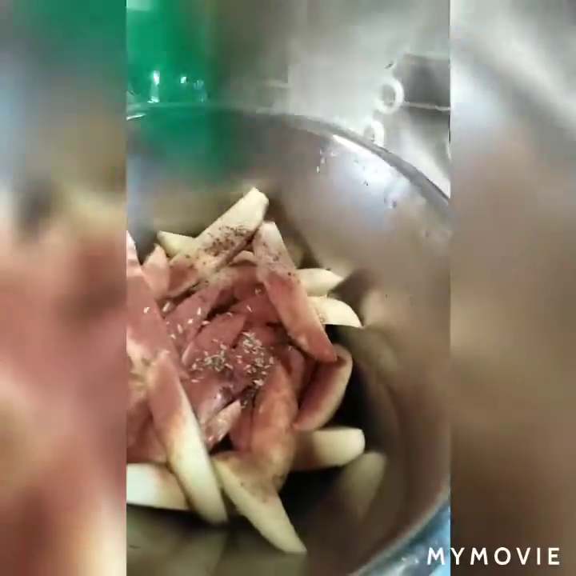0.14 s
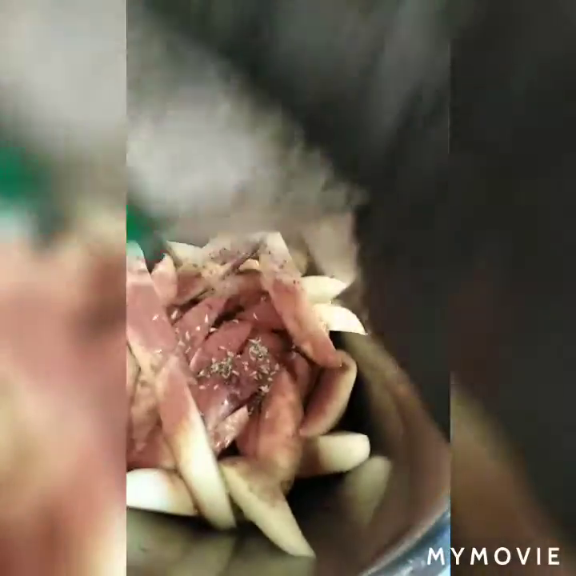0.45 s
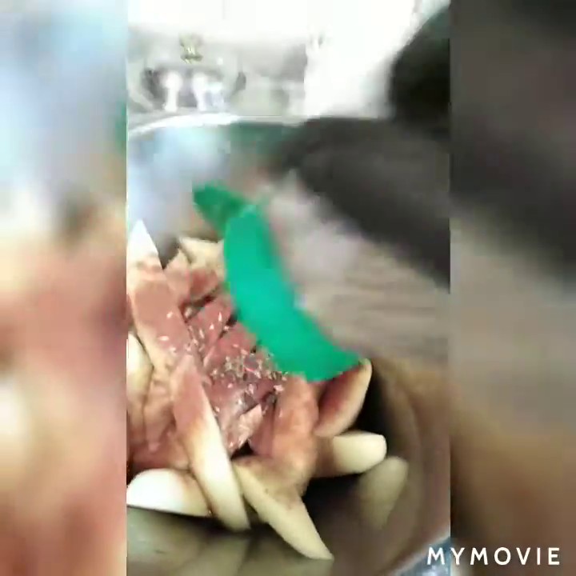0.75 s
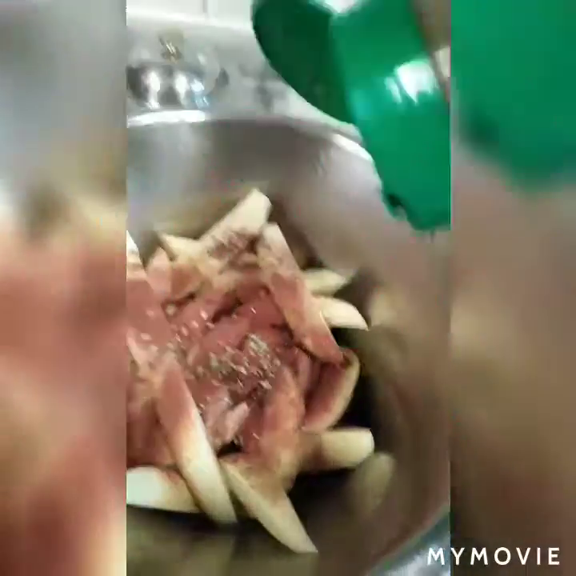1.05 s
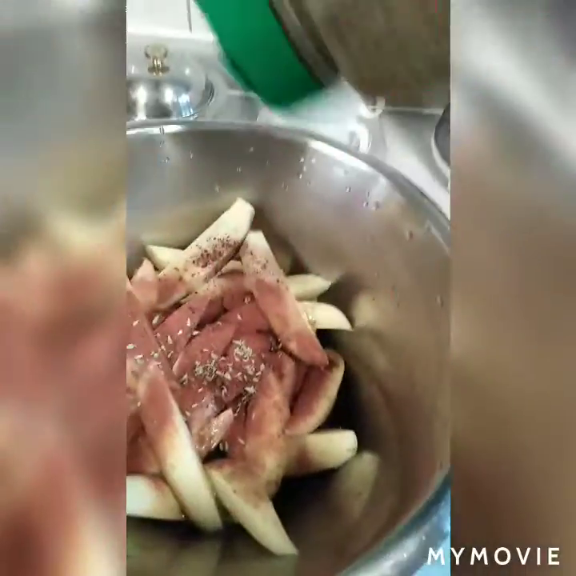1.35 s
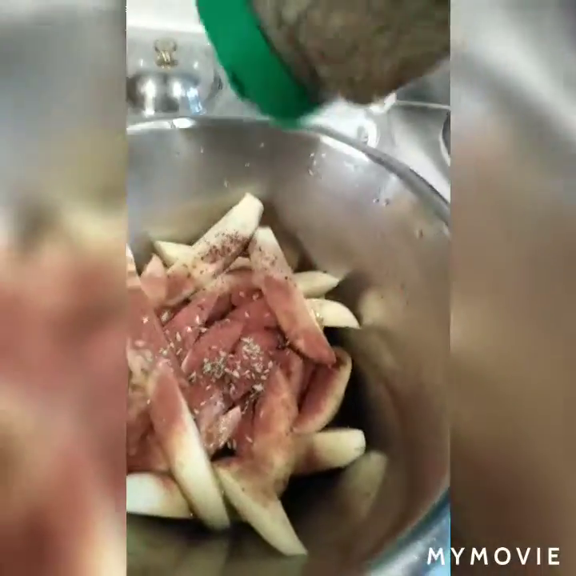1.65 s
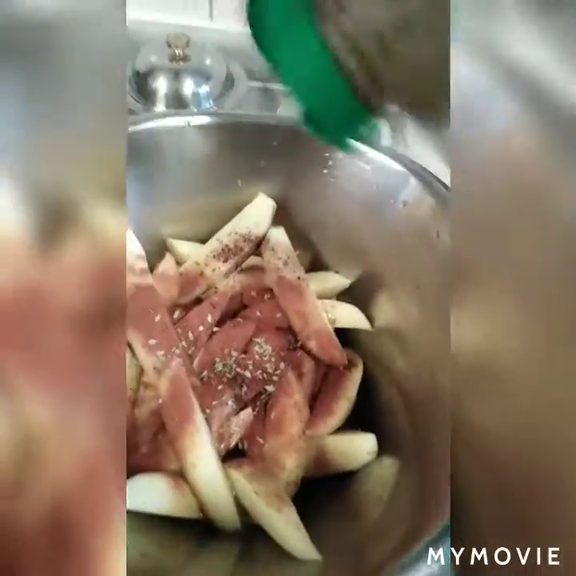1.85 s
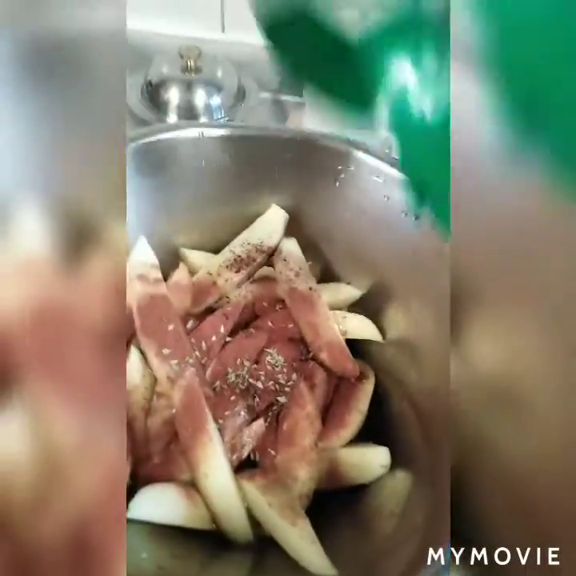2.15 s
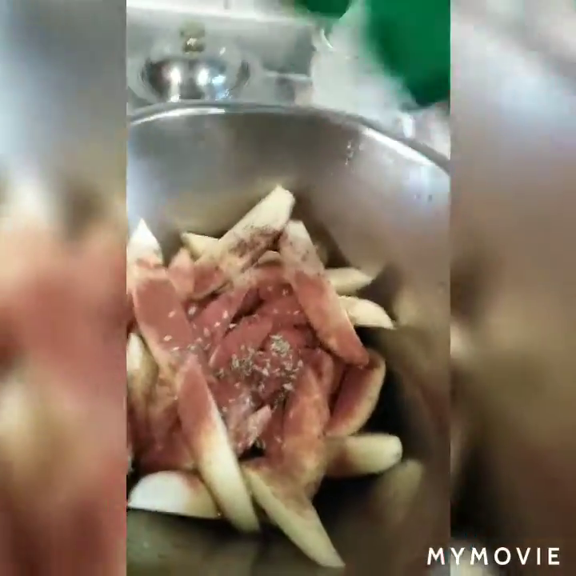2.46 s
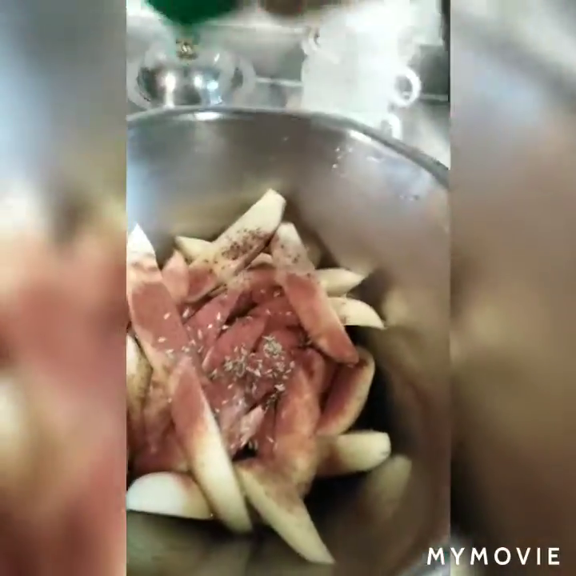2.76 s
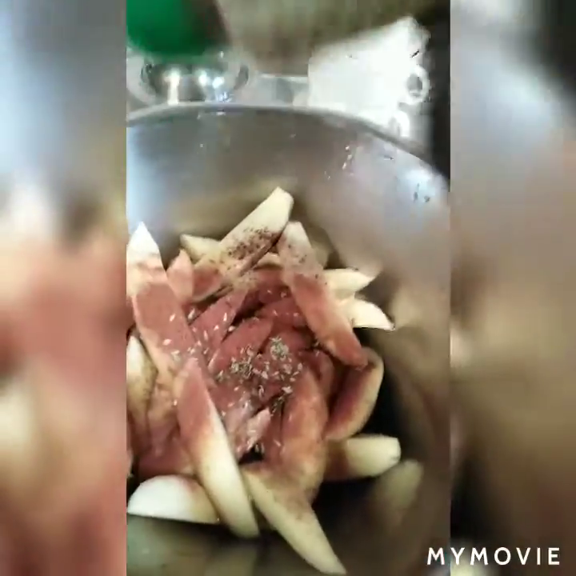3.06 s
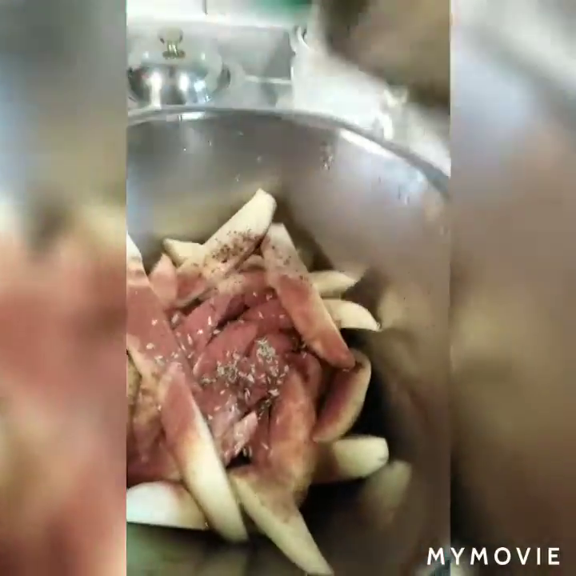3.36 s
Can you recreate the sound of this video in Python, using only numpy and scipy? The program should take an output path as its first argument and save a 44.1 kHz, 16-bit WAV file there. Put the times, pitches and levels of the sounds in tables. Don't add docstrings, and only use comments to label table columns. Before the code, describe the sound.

Dried herbs shaken in a plastic jar, heard close by phone in a small, slightly echoing kitchen. A hollow knock comes at 0.1 s, then bright, grainy bursts swish back and forth about five times a second, with a sharp snap near 0.6 s and lighter ticks until 2.9. At 3.0 s loud knocks make the steel bowl ring and buzz; duller knocks follow at 3.25. A fridge hums faintly throughout.

```python
import sys
import numpy as np
from scipy import signal
from scipy.fft import rfft, irfft
from scipy.io import wavfile
from scipy.ndimage import uniform_filter1d

SR = 44100
rng = np.random.default_rng(int(sys.argv[2]) if len(sys.argv) > 2 else 0)


def boost_factor(decibels):
    exponent = np.asarray(decibels, float) / 20
    return 10 ** exponent


def file_out(sig):
    cols = np.atleast_2d(sig).T
    lim = np.clip(cols, -1, 1)
    pcm = np.round(lim * 32767).astype(np.int16)
    wavfile.write(sys.argv[1], SR, pcm)


N = 154350
LEAD_S = .08
RIM_S = 3.0287


def evened(x):
    return x / np.sqrt(np.mean(x ** 2) + 1e-20)


def read(points, hz):
    f, value = np.transpose(points)
    return np.interp(np.log(hz + 1), np.log(f + 1), value)


def add(mix, s, sound):
    part = mix[round(s * SR):][:len(sound)]
    part += sound[:len(part)]


def resonate(x, hz, width_hz):
    turn = np.exp(2j * np.pi * hz * np.arange(len(x)) / SR)
    r = np.exp(-np.pi * width_hz / SR)
    return 2 * (turn * signal.lfilter([1 - r], [1, -r], x / turn)).real


def colour(x, db_of_hz):
    hz = np.fft.rfftfreq(len(x), 1 / SR)
    return irfft(rfft(x) * boost_factor(db_of_hz(hz)), len(x))


def coloured_noise(count, db_of_hz):
    return evened(colour(rng.standard_normal(count), db_of_hz))


def wander(count, size):
    return evened(uniform_filter1d(uniform_filter1d(rng.standard_normal(count), size), size))


def highpass(x, order, cut_hz):
    return signal.sosfilt(signal.butter(order, cut_hz, "high", fs=SR, output="sos"), x)


def ring(modes, t):
    out = np.zeros(len(t))
    for k, (hz, db, t60_s) in enumerate(modes):
        decay = boost_factor(db - 60 * t / max(t60_s, .005))
        out += (-1) ** k * decay * np.sin(2 * np.pi * hz * t)
    return out


def swing(length_s, level_db, tilt_db, swell_db_ms, fall_db_s, sag_db):
    # freq_hz, density_db_per_hz
    flakes = [(250, -13), (550, -12), (1000, -11), (1500, -11.5), (2000, -8.5), (3500, -9), (11200, -6.5),
              (14500, -11.5)]
    flakes_per_s, spread_db, patch_db, clump_db = 24000, .7, 2.5, 1
    t = np.arange(12288) / SR - LEAD_S
    hit = rng.random(len(t)) < flakes_per_s / SR
    size = np.minimum(rng.exponential(1, len(t)), 5)
    clicks = hit * boost_factor(spread_db * size) * rng.standard_normal(len(t))

    z = signal.stft(clicks, nperseg=256)[2]
    patch = uniform_filter1d(rng.standard_normal(z.shape), size=15, axis=0)
    patch = evened(uniform_filter1d(patch, size=7, axis=1))
    clicks = signal.istft(z * boost_factor(patch_db * patch), nperseg=256)[1][:len(t)]
    shower = evened(colour(clicks, lambda hz: read(flakes, hz) + tilt_db * np.log2((hz + 200) / 6000)))

    swell = swell_db_ms * 1000 * np.minimum(t, 0)
    sag = sag_db * np.clip(t / length_s, 0, 1)
    fall = fall_db_s * np.maximum(t - length_s, 0)
    shape_db = uniform_filter1d(swell + sag - fall, size=250)
    return shower * boost_factor(level_db + shape_db + clump_db * wander(count=len(t), size=150))


def shakes():
    # arrival_s, length_s, level_db, tilt_db_per_octave, swell_db_per_ms
    throws = [(.254, 0.031, -31.5, -0.2, 1.1), (0.419, 0.088, -50, -1.5, 7),
              (0.603, 0.04, -35.5, 0.55, 1.5), (0.791, 0.038, -32.5, -1, 1.3), (.987, 0.039, -33, 1, 0.8),
              (1.185, .015, -32, 1, 2.4), (1.359, .045, -41, -0.6, 0.5), (1.533, 0.029, -44, -0.6, 0.5),
              (1.698, 0.032, -42.5, -0.5, .5), (1.907, 0.056, -42, -0.2, 0.7),
              (2.134, 0.042, -40.5, -0.5, 0.4), (2.353, 0.043, -39, 0, 0.3), (2.573, 0.046, -41, -0.6, .5),
              (2.954, .05, -38.5, -0.2, 2.4), (3.305, 0.031, -36.5, 0.3, 0.6), (0.061, .17, -60, -2, .3),
              (2.77, 0.079, -62.5, 0.1, .3), (1.222, 0.024, -38.5, 1.5, 1.2), (3.122, 0.2, -57.5, -3, 4),
              (3.44, .08, -50, -1, .3)]
    # arrival_s, length_s, level_db, tilt_db_per_octave, swell_db_per_ms
    returns = [(.008, 0.0094, -40, 1.5, 1.5), (.318, 0.015, -27, -0.14, 1), (0.667, 0.0077, -34, -0.8, 1),
               (0.861, 0.018, -34, -0.7, .5), (0.894, 0.028, -39, -0.4, .3), (1.071, 0.031, -36, -0.3, .3),
               (1.271, 0.016, -37.5, 0.1, 0.2), (1.435, 0.024, -37, 0.1, 0.6),
               (1.608, 0.0089, -39, 0.5, .35), (1.776, 0.016, -38.5, -0.4, 0.64),
               (1.992, .03, -37, -0.36, .6), (2.228, 0.023, -34, 0.56, 0.5), (2.444, 0.036, -35, -0.2, 0.3),
               (2.669, 0.035, -36.5, -0.17, 0.55), (3.029, 0.013, -29, -3.7, 1.8),
               (3.368, 0.013, -32.5, 0.1, 0.46)]
    out = np.zeros(N + SR)
    for start_s, *row in throws:
        add(out, start_s, swing(*row, fall_db_s=486, sag_db=-2.5))
    for start_s, *row in returns:
        add(out, start_s, swing(*row, fall_db_s=474, sag_db=-0.5))
    return out[round(LEAD_S * SR):][:N]


def ticks():
    # start_s, level_db, length_s
    clumps = [
        (0.565, -45.5, 0.037),
        (0.959, -35.5, 0.011),
        (1.158, -48, .02),
        (1.305, -37, 0.0068),
        (2.091, -36, 0.012),
        (2.307, -31.5, 0.0051),
        (2.524, -43.5, 0.012),
        (2.876, -59, 0.027),
        (.498, -50.5, 0.027),
    ]
    # freq_hz, width_hz, level_db
    lid_modes = [(7300, 2500, 14), (11800, 5600, -0.5)]
    out, t = np.zeros(N), np.arange(3000) / SR
    for start_s, db, length_s in clumps:
        puff = rng.standard_normal(len(t))
        lid = sum(boost_factor(g) * resonate(resonate(puff, hz, w), hz, w) for hz, w, g in lid_modes)
        attack = np.minimum(t / 0.00091, 1)
        add(out, start_s, evened(lid) * attack * boost_factor(db - 9 * t / length_s))
    return out


def snaps():
    # start_s, level_db
    grains = [
        (.5965, -21),
        (2.0925, -34),
        (2.3065, -29),
        (1.3115, -33),
    ]
    out, t = np.zeros(N), np.arange(400) / SR
    for start_s, db in grains:
        bright = evened(np.diff(rng.standard_normal(401)))
        add(out, start_s, bright * boost_factor(db - 60 * t / .004))
    return out


def herbs():
    return highpass(shakes() + ticks() + snaps(), 3, cut_hz=240)


def counter_boom(t, level_db, body_hz):
    # freq_hz, density_db_per_hz
    wood = [(70, -6), (130, 2), (280, 0.5), (500, 0.1), (1100, -10), (1500, -29), (3000, -45)]
    rim_loss_db = -14 * np.log2(body_hz / 430)
    boom = coloured_noise(len(t), lambda hz: read(wood, hz))
    return boom * (1 - np.exp(-t / 0.0075)) * boost_factor(level_db - 21.5 + rim_loss_db - 60 * t / 0.26)


def jar_knocks():
    # start_s, level_db, body_hz, blow_ms, crack_db
    blows = [
        (0.0783, -27, 236, 1.7, -62),
        (0.1054, -9, 440, .5, -32),
        (3.0058, -8, 420, 1.6, -64),
        (3.0286, -2, 660, .3, -28),
        (3.0367, -6, 570, 1, -53),
        (3.2292, -9, 350, .25, -39),
        (3.263, -14, 420, .35, -37),
        (3.434, -50, 430, .3, -44),
    ]
    # body_t60_s, low_walls_db, high_walls_db, counter_db
    grips = [
        (.025, -8, -15, -14),
        (.045, 1, -1, 2),
        (.034, -14, -25, -8),
        (.018, -12, -1, -3),
        (.016, -12, -12, -3),
        (.025, -3, 2, -4),
        (.03, -5, 2, -3),
        (.04, 0, 0, 0),
    ]
    # freq_hz, level_db, t60_s
    low_walls = [(125, -17, .07), (290, -9, .04), (510, -10, .05), (735, -15, .04)]
    # freq_hz, level_db, t60_s
    high_walls = [(960, -8, .04), (1130, -10, .022), (1400, -8, .018), (1800, -13, .014), (2180, -14, .018),
                  (2800, -25, .012)]
    out, t = np.zeros(N), np.arange(SR // 2) / SR
    for (start_s, db, hz, blow_ms, crack_db), (t60_s, low_db, high_db, counter_db) in zip(blows, grips):
        blow = np.sin(np.pi * np.minimum(t[:400] * 1000 / blow_ms, 1)) ** 2
        body = ring([(hz, 0, t60_s)], t)
        body += boost_factor(low_db) * ring(low_walls, t) + boost_factor(high_db) * ring(high_walls, t)
        body *= 1 - np.exp(-t / .0008)
        add(out, start_s, boost_factor(db) * np.convolve(body, blow / blow.sum()))
        add(out, start_s, counter_boom(t, db + counter_db, hz))
        grit = coloured_noise(len(t), lambda f: -4 * np.log2(f / 1000 + 1))
        add(out, start_s, grit * boost_factor(crack_db - 60 * t / .045))
    return out


def rim():
    # freq_hz, level_db, t60_s
    bowl = [(730, -8, .2), (361, -6, .2), (1053, 0, .17), (1745, -11, .07), (1150, -1, .15), (1260, -9, .4),
            (1324, -13, .15), (1596, -7.5, .4), (1680, -7, .22), (2492, -17, .15), (2729, -17, .2),
            (3420, -3, .05), (4377, -11, .05), (3920, -13, .06)]
    out, t = np.zeros(N), np.arange(SR // 2) / SR
    for mode, late in zip(bowl, rng.random(len(bowl))):
        add(out, RIM_S + late / mode[0], boost_factor(-23) * ring([mode], t))
    return out


def knocks():
    return highpass(jar_knocks() + rim(), 4, cut_hz=100)


def buzz():
    # freq_hz, density_db_per_hz
    shimmer = [(300, -10), (750, 1), (1050, -2), (1400, -7), (1750, -6), (2100, -15), (3400, -15),
               (6000, -28)]
    out, t = np.zeros(N), np.arange(SR // 2) / SR
    noise = coloured_noise(len(t), lambda hz: read(shimmer, hz))
    level_db = -32.5 - 60 * t / .33 + 2.5 * wander(count=len(t), size=120)
    add(out, RIM_S, noise * (1 - np.exp(-t / .006)) * boost_factor(level_db))
    return out


def room(x):
    # freq_hz, t60_s
    decay = [(150, 0.77), (500, 0.52), (2000, 0.49), (8000, 0.35), (14000, 0.58)]
    taps, count = np.zeros(SR), (SR - 201) // 10
    where = np.arange(200, SR - 10, 10) + rng.integers(0, 10, count)
    taps[where] = rng.choice([-1., 1.], count)
    hz, t, z = signal.stft(taps, SR, nperseg=256)
    tail = signal.istft(z * boost_factor(-60 * t / read(decay, hz)[:, None]), SR, nperseg=256)[1]
    return signal.fftconvolve(x, tail / np.linalg.norm(tail))[:N]


def fridge():
    # freq_hz, level_db_rms
    mains = [(59.2, -71), (118.4, -76)]
    # freq_hz, width_hz, level_db
    panels = [(128.5, 58, -16.5), (314.8, 82, 0.5), (410, 102, -5.5)]
    # time_s, level_db, upper_panel_db, low_panel_db
    load = [(0, -48, -0.5, 8), (.45, -52.5, -1, 10), (.7, -50, 1.5, 2), (.85, -51, 4.8, -2.5),
            (1.35, -53, -3.5, 5), (1.5, -52, -2, 0.5), (1.85, -50, -6.5, -0.5), (2.08, -56, -3, -5),
            (2.16, -55, 10, -6), (2.27, -50.5, 0, 1.5), (2.5, -58, -4, -3), (2.65, -49.5, -3, -6),
            (2.78, -57.5, 11.5, -2), (2.92, -58.5, -3, -6), (3.5, -49, -0.5, 5)]
    # freq_hz, density_db_per_hz
    hiss_points = [(40, -30), (200, -10), (340, 0), (600, -18), (3140, -22), (5800, -18), (9000, -10),
                   (14500, -13)]
    t, noise = np.arange(N) / SR, rng.standard_normal(N)
    hum = sum(np.sqrt(2) * boost_factor(db) * np.sin(2 * np.pi * hz * t) for hz, db in mains)
    low, main, upper = (boost_factor(db) * evened(resonate(resonate(resonate(noise, hz, w), hz, w), hz, w))
                        for hz, w, db in panels)
    time_s, load_db, upper_db, low_db = np.transpose(load)
    drone = low * boost_factor(np.interp(t, time_s, low_db)) + main + upper * boost_factor(np.interp(t, time_s, upper_db))
    drone *= boost_factor(np.interp(t, time_s, load_db) + wander(count=N, size=2500))
    hiss = coloured_noise(N, lambda hz: read(hiss_points, hz))
    return hum + drone + boost_factor(-76) * hiss


def scene():
    rustle, taps = herbs(), knocks()
    echo = room(boost_factor(-10.5) * rustle + boost_factor(-14.5) * taps)
    return (rustle + taps + echo + buzz() + fridge())[None]


def band_limit(x):
    return signal.sosfilt(signal.butter(12, 15240, fs=SR, output="sos"), x)


def record(dry):
    lowpass = signal.firwin(511, 14330, window=("kaiser", 6), fs=SR)
    mix = signal.oaconvolve(dry, lowpass[None], "same")
    return band_limit(mix)


dry = scene()
out = record(dry)
file_out(out)
```